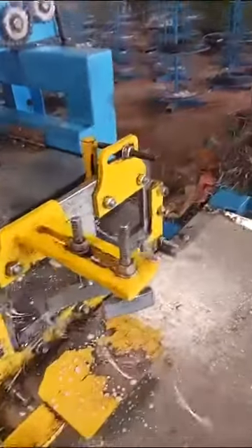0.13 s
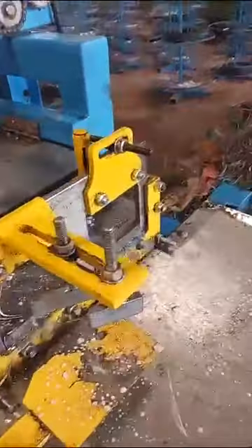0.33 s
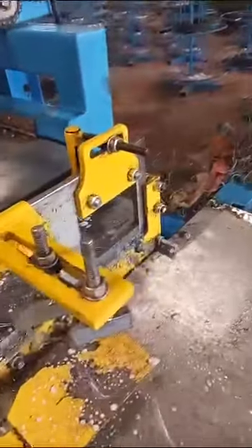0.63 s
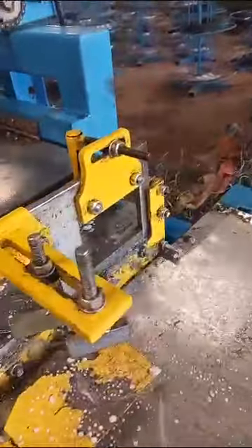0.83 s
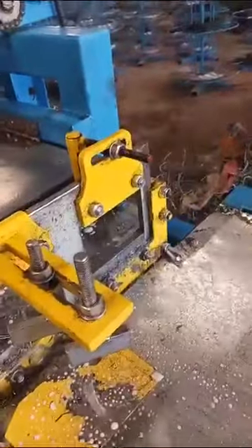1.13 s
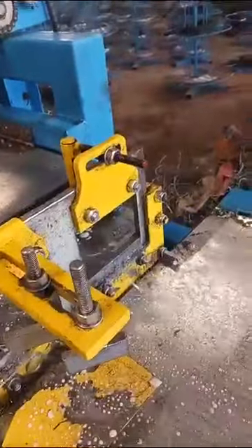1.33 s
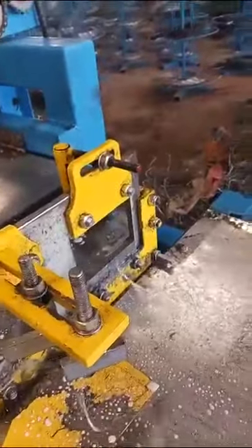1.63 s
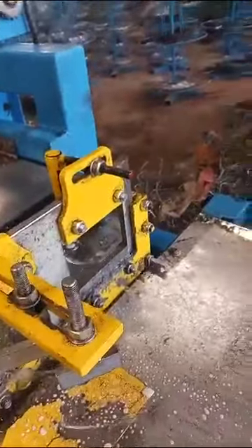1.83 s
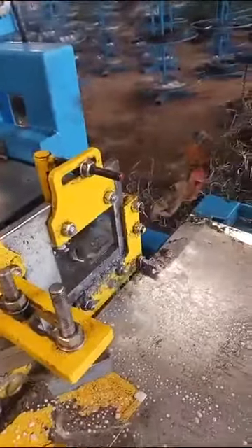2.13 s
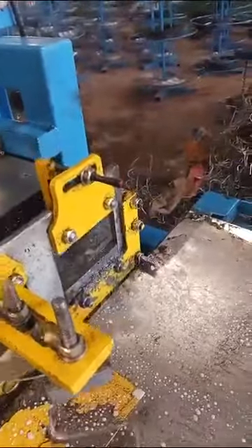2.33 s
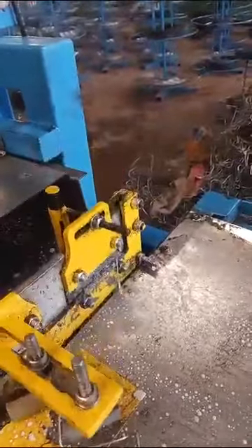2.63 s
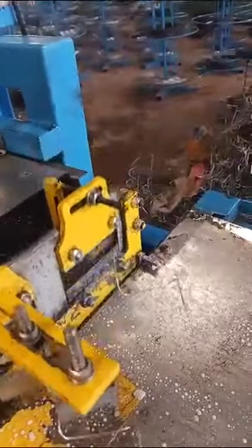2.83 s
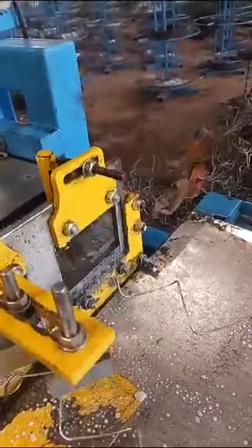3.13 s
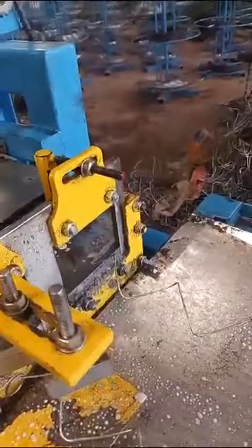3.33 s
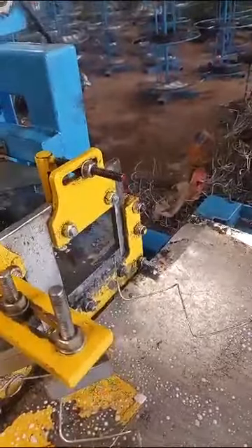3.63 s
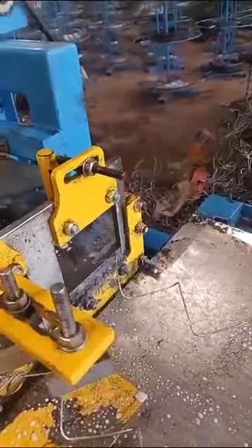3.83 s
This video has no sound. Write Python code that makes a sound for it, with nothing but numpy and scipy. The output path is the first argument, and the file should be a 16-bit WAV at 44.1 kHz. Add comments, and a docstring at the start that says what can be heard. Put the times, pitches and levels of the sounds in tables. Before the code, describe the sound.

Close to a fence-weaving machine in an open workshop: bright, irregular wire rattle and scraping, a heavy two-part clunk, a brief lull with faint motor whine, then groaning gears and a bouncing steel clank.

```python
"""A chain-link fencing machine in an open workshop, heard through two microphones. Wire scrapes through the forming
blade, squeaking once, while the turning spiral slaps and rattles in its steel trough, with soft low thumps at left.
The mechanism shifts with a heavy double clunk, then the scraping dies away and the motor idles with a faint whine.
Then the drive takes up with a groan and a chirp of wire, and the machine comes down with a chattering clank.
Blows and slips ring noise-built steel, the motor and gears are noise and sines, and a decaying tail is the room."""
import sys
import numpy as np
from scipy import signal
from scipy.fft import rfft, irfft, next_fast_len
from scipy.io import wavfile

SR = 44100
rng = np.random.default_rng(int(sys.argv[2]) if len(sys.argv) > 2 else 0)


def transcribe(signal):
    """Save signal, clipped to [-1, 1], as a 16-bit WAV file at the path in sys.argv[1]."""
    frames = np.atleast_2d(signal).T
    limited = np.clip(frames, -1, 1)
    pcm = np.round(limited * 32767).astype(np.int16)
    wavfile.write(sys.argv[1], SR, pcm)


N = 176400
T = np.arange(N) / SR
SIDES = np.array([[1], [-1]])  # left, right

# the spiral slaps the trough, before each layer's trim: [t/s, level/dB, midrange ring against it/dB]
SPIRAL_SLAPS = [(0.0463, -20, -3.5), (0.067, -32, -2), (0.153, -34.5, 6), (0.2104, -30.5, 8.5),
                (0.2328, -31.5, 9), (0.2964, -26, 1), (0.3484, -23, -6), (0.375, -32, 7.5),
                (0.394, -26.5, 2), (0.4666, -32.5, 8.5), (0.5407, -40, 18.5), (0.5585, -24, 3.5),
                (0.579, -25, -9), (0.634, -20, -3), (0.6544, -30, 4), (0.707, -26, 6.5), (0.725, -20, -4.5),
                (0.8053, -26.5, -2), (0.8692, -28, 7.5), (0.892, -22, -7), (0.9276, -20, -13),
                (0.9676, -26, 0.5), (1.0356, -22, 1), (1.0563, -23, -8), (1.1322, -22.5, -5.5),
                (1.1998, -21.5, -1.5), (1.2225, -21, -0.5), (1.252, -25, -17), (1.302, -20.5, -2.5),
                (1.365, -21.5, -3.5), (1.3854, -20, -5), (1.409, -22, -17), (1.4683, -23.5, -5.0),
                (1.5339, -31.5, 10), (1.5533, -19, -4.5), (1.6015, -23.5, -29), (1.6345, -20.5, -8),
                (1.662, -39, -8), (1.696, -33.5, 11.5), (1.7165, -19.5, -4), (1.7564, -22.0, -18),
                (1.797, -21.5, -2), (1.8691, -23, 0), (1.8848, -25.5, -0.5), (1.9644, -23.5, -5),
                (2.0224, -22, -0.5), (2.0515, -21, -3.5), (2.1359, -25.5, -2.5), (2.235, -25, -12),
                (2.2644, -31.5, 1.5), (2.3464, -27, -12), (2.3725, -20.5, -6.5), (2.5192, -28.5, 0.5)]
# scraping wire, before each layer's trim: [t/s, level/dB]
WIRE_FEED = [(0, -25.5), (.14, -29.5), (.32, -23), (.52, -25), (.8, -23), (1.12, -25), (1.4, -21.5),
             (1.68, -23.5), (2.1, -19.5), (2.2, -28), (2.28, -23), (2.32, -31), (2.41, -25.5), (2.48, -33),
             (2.58, -31.5), (2.7, -26.5), (2.92, -27), (3.0, -37.5), (3.14, -45.5), (3.3, -44.5),
             (3.4, -39), (3.49, -43), (3.63, -24), (3.8, -32), (3.95, -40.5)]
# colour of the gears' rumble and friction: [f/Hz, relative level/dB]
GEAR_COLOUR = [(30, -12), (80, -3), (200, -5.5), (450, 0), (800, 0.5), (1500, -2.5), (3000, -6.5),
               (6000, -19.5)]
# bright colour of wire on steel: [f/Hz, relative level/dB]
WIRE_COLOUR = [(3000, -10), (4300, -6), (5400, 2.5), (6400, 4.5), (7400, -8), (9000, -6.5), (11500, -4.5)]
# stereo placing: [f/Hz, left against right level/dB]
LEFT_RIGHT = [(60, -4), (150, -5), (500, -2), (1500, -.2), (3000, -.6), (5000, -2.7), (8500, 4.5),
              (11500, -.5)]

# bunching of the steel's modes: spacing, unevenness, and time the contact stays on one spot
MODE_CLUSTER_HZ, MODE_CONTRAST_DB, SPOT_S = 170, 5.5, .016
ROOM_T60_S, ROOM_DAMPING = 1, 0.19  # at 1 kHz; power by which it shortens with frequency


def spiral():
    """The turning spiral slaps its trough: a bright wire rattle over the trough's short ring."""
    # midrange colour of the trough: [f/Hz, relative level/dB]
    trough_colour = [(200, -2), (900, 4), (1400, 13.5), (1700, 7.5), (2100, 7), (3300, 8.5), (4200, 1),
                     (8000, -62)]
    bright_rows = [(s, db) for s, db, mid_db in SPIRAL_SLAPS]
    middle_rows = [(s, db + mid_db) for s, db, mid_db in SPIRAL_SLAPS]
    bright = blows(bright_rows, rattle_db=3.5, rattle_s=0.014, per_s=1500)
    middle = blows(middle_rows, rattle_db=2, rattle_s=0.013, per_s=1500)
    wire = from_db(6.5) * body(bright, WIRE_COLOUR, ring_s=0.049, room_db=-22.5)
    trough = from_db(2) * body(middle, trough_colour, ring_s=0.043, room_db=-22)
    return wire + trough + from_db(-21) * frame(middle)


def pings(count=5):
    """Each slap makes the springy wire twang a few times within 25 ms, as decaying sines of chance pitch."""
    ping_db, t60_s, attack_s = 0.5, 0.12, 0.005
    low_hz, high_hz = 1250, 6600
    t = T[:SR // 8]
    ring = np.exp(-np.log(1000) * t / t60_s) * (1 - np.exp(-t / attack_s))
    out = np.zeros((2, N))
    for s, db, mid_db in SPIRAL_SLAPS:
        for late, pitch, size, left, right in rng.random((count, 5)):
            i = int((s + .025 * late) * SR)
            hz = low_hz * (high_hz / low_hz) ** pitch
            # low twangs follow the midrange ring; high ones are softer
            gain = from_db(db + ping_db + (1 - pitch) * mid_db / 2 - 4.8 * size - 3 * pitch)
            phase = np.array([[left], [right]])
            out[:, i:i + len(t)] += gain * ring * np.sin(2 * np.pi * (hz * t + phase))
    return out


def feed():
    """Wire drags through the blade in uneven little slips that excite the ringing steel."""
    # colour of the scrape: [f/Hz, relative level/dB]
    scrape_colour = [(900, -30), (1400, -1.5), (2500, -6), (3600, -1.5), (4200, -3), (5300, 5), (6100, -1),
                     (7400, -6), (9000, -2), (11500, -9)]
    slips = grains(per_s=1800, spread_db=3)
    slips = slips * from_db(0.86 * drift(17))
    scrape = rms_one(body(slips, scrape_colour, ring_s=0.05, room_db=-20))
    return from_db(-0.5) * level(WIRE_FEED) * scrape


def grit():
    """Burrs on the wire snap past the blade as a fine spatter of dry ticks, each a short noise burst."""
    grit_db, per_s, tick_t60_s = -7, 170, .012
    t = T[:SR // 20]
    tick = noise(WIRE_COLOUR, size=len(t)) * from_db(-60 * t / tick_t60_s)
    contacts = grains(per_s, spread_db=2)[None]
    spatter = signal.oaconvolve(contacts, tick, axes=1)[:, :N]
    return from_db(grit_db) * level(WIRE_FEED) * rms_one(spatter)


def squeaks():
    """The wire catches in the guide and sings briefly, in wavering partials under one swell."""
    # swell of the squeak: [t/s, length/s, level/dB]
    swells = [(0.361, 0.043, -22)]
    # partials: [f/Hz, level against the swell/dB]
    partials = [(2030, -2.5), (5960, -1), (8710, 6), (9950, -1.5)]
    swell = sum(from_db(db) * half_sine(s, length) for s, length, db in swells)
    tone = 0
    for hz, db in partials:
        cycles = np.cumsum(hz * (1 + 0.0029 * drift(90))) / SR + rng.random((2, 1))
        gain = from_db(db + SIDES * at_hz(LEFT_RIGHT, hz) / 2)
        tone = tone + gain * np.sin(2 * np.pi * cycles)
    return swell * tone


def mechanism():
    """The double clunk, the clank and the skidding wire: blows that ring steel and, save the skids, the frame."""
    # the mechanism shifts, before trim: [t/s, level/dB]
    clunk_rows = [(2.590, -25), (2.599, -19), (2.613, -13.5), (2.623, -18), (2.650, -18.5), (2.673, -13),
                  (2.694, -20)]
    # steel strikes steel and bounces, before trim: [t/s, level/dB]
    clank_rows = [(2.373, -27.5), (3.637, -13), (3.664, -15), (3.687, -14.5), (3.713, -19), (3.732, -21)]
    # loose wire skids on the table: [t/s, level/dB]
    skid_rows = [(3.318, -39.5), (3.352, -27), (3.453, -23), (3.468, -25.5), (3.637, -17.5), (3.985, -33.5)]
    # their colours: [f/Hz, relative level/dB]
    clunk_colour = [(35, -21), (110, 3), (190, -2), (350, 4.5), (500, -0.5), (850, 2), (1300, -2.5),
                    (2700, 1), (3700, -8), (6000, -12.5), (11500, -21.5)]
    clank_colour = [(40, -38), (122, 2.5), (187, -4), (362, -4), (504, -4), (849, -2), (1500, -3.5),
                    (4150, -8.5), (5390, -2), (7510, -15.5), (11500, -23)]
    skid_colour = [(300, 4.5), (1500, -8), (2500, -0.5), (4000, 2.5), (6000, 7), (7500, -7), (9500, 1.5),
                   (11500, -7.5)]
    clunks = blows(clunk_rows, rattle_db=5, rattle_s=0.023, per_s=2000)
    clanks = blows(clank_rows, rattle_db=2.0, rattle_s=0.019, per_s=1500)
    skids = blows(skid_rows, rattle_db=9, rattle_s=0.014)
    heavy = body(clunks, clunk_colour, ring_s=0.065, room_db=-17.5, contrast_db=0)
    chatter = body(clanks, clank_colour, ring_s=0.082, room_db=-14.5, contrast_db=2.5)
    sliding = body(skids, skid_colour, ring_s=0.041, room_db=-12)
    return from_db(0.5) * heavy + from_db(2.5) * chatter + sliding + from_db(-26) * frame(clunks + clanks)


def thumps():
    """Soft low thumps, as of air or handling buffeting the microphones: band-passed pulses, stronger at left."""
    # soft low thumps, before the band-pass: [t/s, level/dB]
    buffets = [(1.063, -14.5), (1.306, -20), (1.385, -30), (1.474, -19.5), (1.720, -18.5), (1.885, -19.5),
               (3.695, -17.5)]
    low_hz, high_hz, left_db = 48, 392, 10
    push = bandpass(blows(buffets, rattle_db=-11.5, rattle_s=0.12), low_hz, high_hz)
    push = push * SR / (2 * high_hz)  # makes up the height lost in the narrow band
    return push * from_db(SIDES * left_db / 2)


def restart():
    """The gears groan under the returning load and the taut wire chirps, both as narrow friction noise."""
    # groan, silent outside its span: [t/s, level/dB]
    groan_level = [(3.3, -59), (3.36, -34.5), (3.46, -36.5), (3.62, -59)]
    chirp_s, chirp_length_s, chirp_db = 3.435, .05, -34
    groan = from_db(np.interp(T, *np.transpose(groan_level), left=-np.inf, right=-np.inf))
    chirp = from_db(chirp_db) * half_sine(chirp_s, chirp_length_s)
    return groan * resonance(660, width_hz=130) + chirp * resonance(2480, width_hz=150)


def drive():
    """Gears and chains rumble as noise that follows the load; idle noise and humming sines run throughout."""
    # rumble: [t/s, level/dB]
    load = [(0, -32), (.3, -31), (1.0, -31), (2.1, -28.5), (2.25, -35.5), (2.57, -34.5), (2.65, -31.5),
            (2.9, -29.5), (3.08, -39.5), (3.31, -45.5), (3.36, -34), (3.46, -27), (3.6, -29), (3.75, -33),
            (4, -31)]
    # colour of the idling motor: [f/Hz, relative level/dB]
    idle_colour = [(30, -4), (102, -1.5), (185, -2.5), (255, 1.5), (350, -9.5), (441, 1), (525, -5.5),
                   (1460, -12), (2580, -11), (3000, -21.5), (11500, -37)]
    # hum and whine of the motor, before wander and placing: [f/Hz, rms level/dB]
    motor_lines = [(89, -49.5), (358, -51), (2350, -56.5)]
    gears = level(load) * noise(GEAR_COLOUR) * from_db(1.78 * drift(13.2))
    hum = 0
    for hz, db in motor_lines:
        swing = from_db(db + 2 * drift(26))
        cycles = np.cumsum(hz * (1 + 0.0019 * drift(14.5))) / SR
        hum = hum + swing * np.sqrt(2) * np.sin(2 * np.pi * cycles)
    return gears + from_db(-38.5) * noise(idle_colour) + hum * from_db([[-2], [1]])


def whine():
    """The unloaded motor sings one thin, unsteady note, made of very narrow noise half buried in its rumble."""
    # whine: [t/s, level/dB]
    whine_level = [(3.0, -60), (3.15, -50), (3.33, -49), (3.45, -70)]
    return level(whine_level) * resonance(2665, width_hz=36)


def frame(force):
    """The steel frame rings in its strongest modes, unequally at the two microphones."""
    # modes, before a chance tilt per side: [f/Hz, level/dB, t60/s]
    modes = [(120.1, -9, 0.68), (672, 1, 0.15), (870.5, 1, 0.18), (1435, 6, 0.14), (2333, -3, 0.093),
             (2623, 4, 0.22), (5500, 6, 0.052)]
    out = np.zeros((2, N))
    for hz, db, t60 in modes:
        r, w = from_db(-60 / (t60 * SR)), 2 * np.pi * hz / SR
        sides = rng.normal(0, 1, (2, 1)) + SIDES * at_hz(LEFT_RIGHT, hz) / 2
        ring = signal.lfilter([0, np.sin(w)], [1, -2 * r * np.cos(w), r * r], force)
        out += from_db(db + sides) * ring
    return out


def body(force, spectrum, ring_s, room_db, contrast_db=MODE_CONTRAST_DB, count=7):
    """Steel rings in mode clusters that change with the spot touched; the workshop tail dulls as it dies."""
    t = T[:SR]
    short = SR // 5
    spot = rng.integers(0, count, N)[(T / SPOT_S).astype(int)]
    size = next_fast_len(N + SR, True)
    out = 0
    for k in range(count):
        ring = noise(spectrum, size=short, cluster_db=contrast_db)
        ring = ring * from_db(-60 * t[:short] / max(ring_s, .002))
        out = out + transform(force * (spot == k), size) * transform(ring, size)
    rest = noise(spectrum, size=SR) * from_db(room_db) * (1 - np.exp(-t / 0.0043))
    tail = 0
    # peel off octave bands from the bottom up, each with its own decay
    for hz in 250 * 2. ** np.arange(7):
        band = signal.sosfiltfilt(signal.butter(2, hz, fs=SR, output="sos"), rest)
        rest = rest - band
        t60 = ROOM_T60_S * (hz / 1000) ** -ROOM_DAMPING
        tail = tail + band * from_db(-60 * t / t60)
    out = out + transform(force, size) * transform(tail, size)
    return irfft(out, size)[:, :N]


def blows(rows, rattle_db, rattle_s, per_s=600):
    """Each blow is one sharp contact and a rattle of smaller ones that swells quickly and dies."""
    hits = np.zeros(N)
    for s, db in rows:
        hits[int(np.clip(s * SR, 0, N - 1))] += from_db(db)
    r, onset = np.exp(-2 / (rattle_s * SR)), np.exp(-1 / (0.0024 * SR))
    energy = signal.lfilter([0, 1 - r], [1, -r], hits ** 2 + 1e-18)
    energy = signal.lfilter([1 - onset], [1, -onset], energy)
    return hits + from_db(rattle_db) * np.sqrt(energy) * grains(per_s, spread_db=2.0)


def grains(per_s, spread_db):
    """Random tiny contacts of uneven size and either sign; rms 1."""
    sizes = from_db(spread_db * np.minimum(rng.exponential(1, N), 4)) * rng.choice([-1, 1], N)
    return rms_one(sizes * (rng.random(N) < per_s / SR))


def resonance(hz, width_hz):
    """Friction noise ringing in one resonance; rms 1."""
    return rms_one(bandpass(noise(GEAR_COLOUR), hz - width_hz / 2, hz + width_hz / 2))


def noise(spectrum, size=N, cluster_db=0):
    """Random-phase stereo noise of a given colour, optionally bunched in chance resonances; rms 1."""
    # stereo width: [f/Hz, side against mid level/dB]
    width = [(30, -2), (70, -5), (300, -5.5), (1000, -1.3), (4000, -.7), (9800, -1), (11300, 7)]
    low_cut_hz = 33
    hz = np.arange(size // 2 + 1) * SR / size
    mid, side = np.exp(2j * np.pi * rng.random((2, len(hz))))
    centres = np.arange(0, SR / 2, MODE_CLUSTER_HZ)
    heights = np.sqrt(3) * rng.uniform(-1, 1, len(centres))  # spread 1
    # clusters flatten out at the bottom and the top
    heights = heights * np.minimum(centres / 2000, 1) / (1 + (centres / 9000) ** 4)
    clusters = np.interp(hz, centres, heights)
    gain = from_db(at_hz(spectrum, hz) + cluster_db * clusters + SIDES * at_hz(LEFT_RIGHT, hz) / 2)
    gain = gain * hz ** 4 / (hz ** 4 + low_cut_hz ** 4)
    stereo = mid + SIDES * side * from_db(at_hz(width, hz))
    return rms_one(irfft(stereo * gain, size))


def drift(corner_hz):
    """Slow chance with spread 1: low-passed noise drawn at every 40th sample."""
    r = np.exp(-80 * np.pi * corner_hz / SR)
    slow = signal.lfilter([1], [1, -2 * r, r * r], rng.standard_normal(N // 40 + 2002))
    slow = rms_one(slow[2000:])  # drop the filter's start
    return np.interp(np.arange(N) / 40, np.arange(len(slow)), slow)


def half_sine(s, length):
    """One smooth swell from 0 to 1 and back."""
    return np.sin(np.pi * np.clip((T - s) / length, 0, 1))


def bandpass(x, low_hz, high_hz):
    """Keep one band."""
    return signal.sosfilt(signal.butter(2, [low_hz, high_hz], "band", fs=SR, output="sos"), x)


def transform(x, size):
    """Padded spectrum, for convolving."""
    return rfft(x.astype(np.float32), size)


def from_db(db):
    """Decibels to gain."""
    return 10 ** (np.asarray(db) / 20)


def rms_one(x):
    """Scale to rms 1."""
    return x / np.sqrt(np.mean(x ** 2) + 1e-20)


def at_hz(points, hz):
    """Read a spectrum on a log-frequency axis."""
    f, value = np.transpose(points)
    return np.interp(np.log(hz + 1e-9), np.log(f), value)


def level(points):
    """Gain over time from (t/s, level/dB) points."""
    return from_db(np.interp(T, *np.transpose(points)))


def scene():
    """The whole machine, from the slapping spiral to the motor behind it, with the thumps at the microphones."""
    wire = spiral() + pings() + feed() + grit() + squeaks()
    shifts = mechanism() + thumps() + restart()
    return wire + shifts + drive() + whine()


def record(dry):
    """Peaks are clipped at full scale, then a steep low-pass cuts the top."""
    cutoff_hz = 11780
    low_pass = signal.ellip(10, .2, 80, cutoff_hz, fs=SR, output="sos")
    return signal.sosfilt(low_pass, np.clip(dry, -1, 1))


dry = scene()
out = record(dry)
transcribe(out)
```